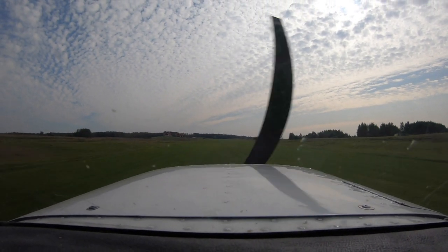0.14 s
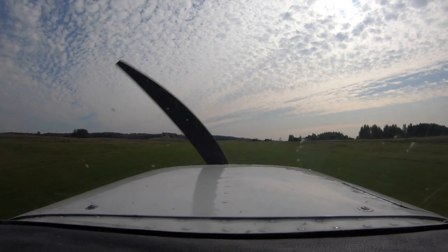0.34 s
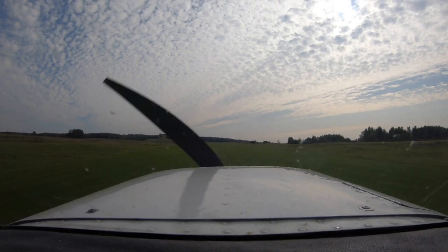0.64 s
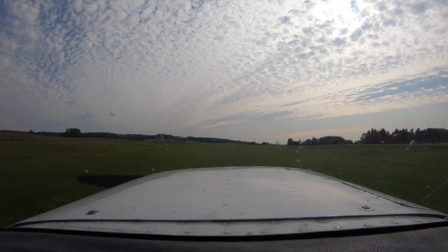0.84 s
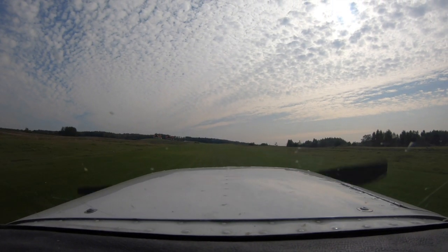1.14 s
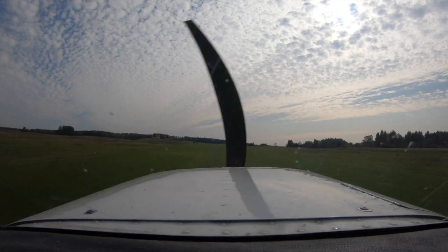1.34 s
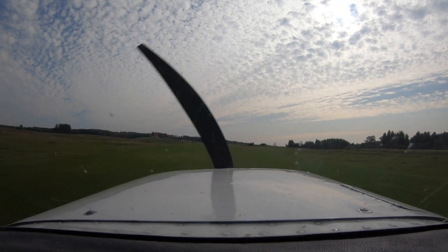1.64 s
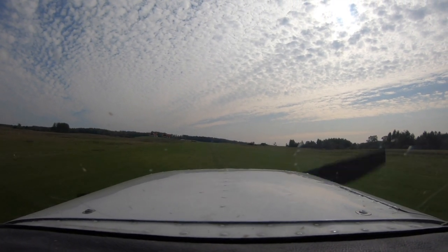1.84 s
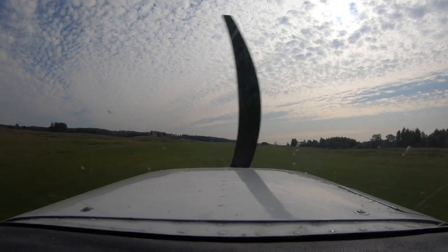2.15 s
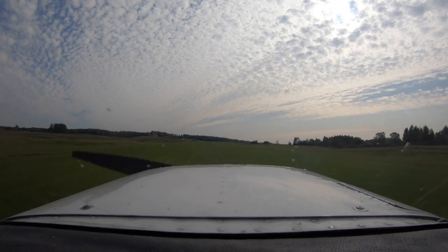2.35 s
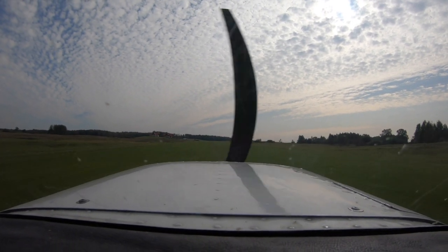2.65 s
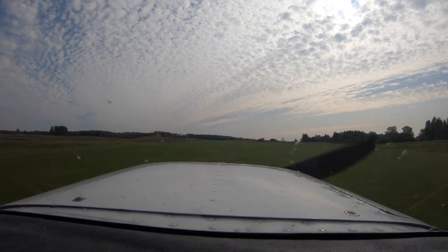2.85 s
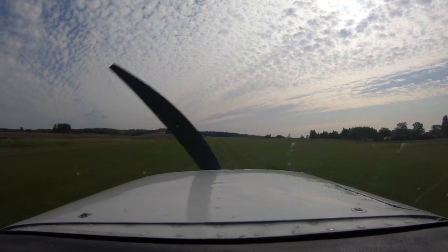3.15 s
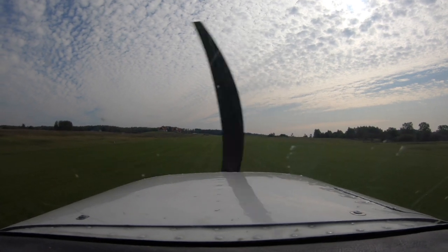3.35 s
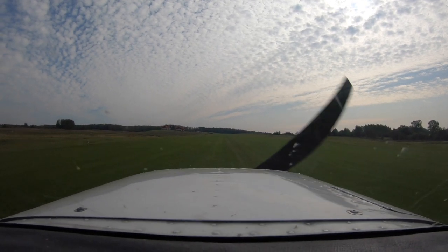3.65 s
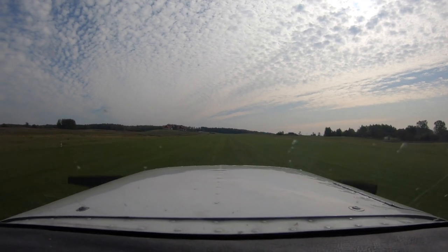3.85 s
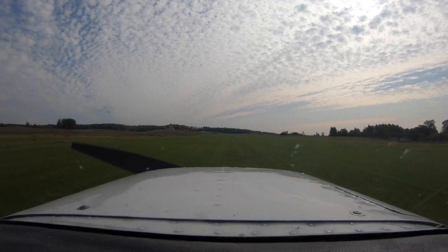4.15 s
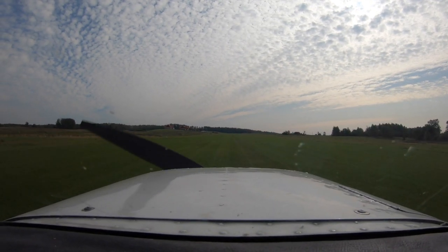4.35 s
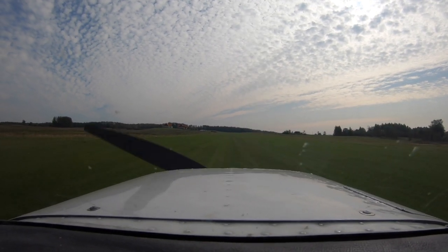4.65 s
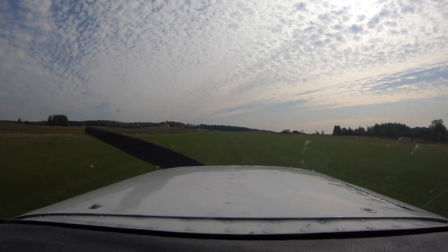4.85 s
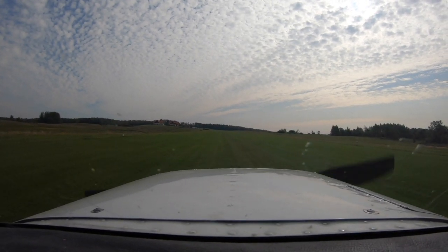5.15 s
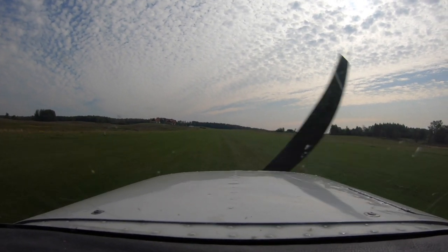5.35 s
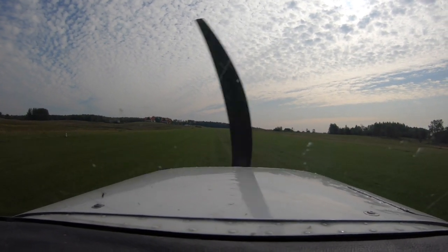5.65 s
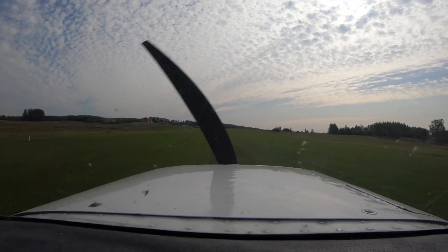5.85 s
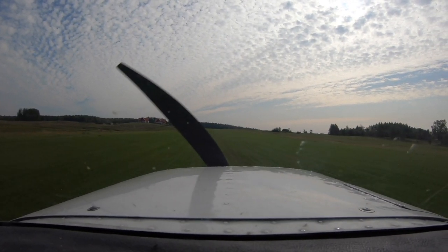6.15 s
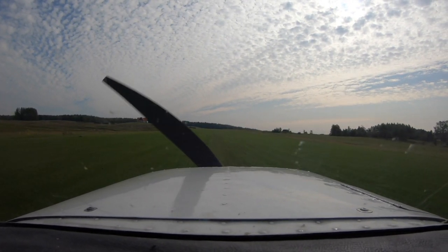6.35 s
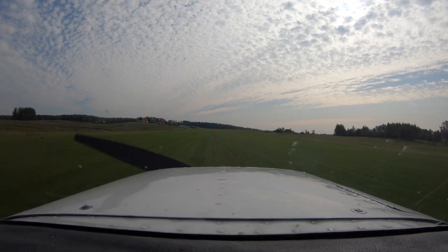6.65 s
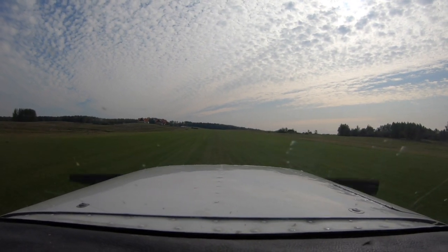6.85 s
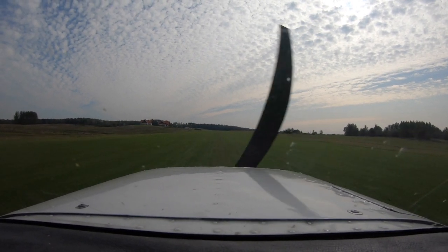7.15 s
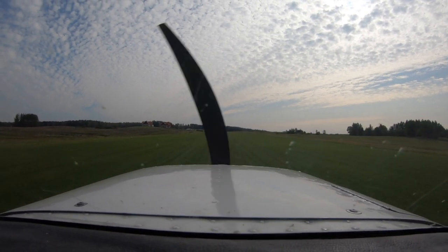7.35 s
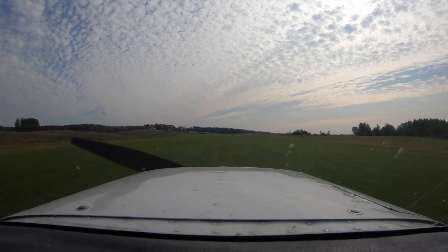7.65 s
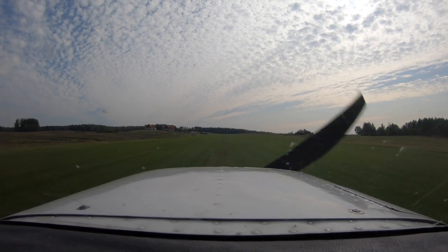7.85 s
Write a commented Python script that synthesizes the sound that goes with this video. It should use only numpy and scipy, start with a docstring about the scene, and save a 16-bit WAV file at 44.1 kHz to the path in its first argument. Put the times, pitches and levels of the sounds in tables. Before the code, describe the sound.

Heard from inside the cabin of a small propeller plane, a piston engine drones near idle and slowly sinks in pitch under the roar and hiss of passing air, with a faint wavering whistle. A little before halfway the wheels touch down on grass. A much louder rumble takes over, with irregular low thumps, drumming and knocking panels and bright rattles from loose fittings, continuing to the end.

```python
"""A light aircraft's four-cylinder engine near idle, heard in the cabin as it glides in and lands.
Firings and blades make a harmonic series that sinks as the engine slows. The slipstream roars and
hisses, panels hum, and air whistles in a gap. From about 3.5 s the wheels roll on grass: impacts
through the gear excite the airframe's modes, panels drum and knock, and loose fittings rattle."""
import sys
import numpy as np
from scipy import signal
from scipy.io import wavfile
from scipy.ndimage import uniform_filter1d

SR = 44100
rng = np.random.default_rng(int(sys.argv[2]) if len(sys.argv) > 2 else 0)


def persist_wave(psi):
    """Save psi, clipped to +-1, as 16-bit WAV."""
    counts = np.round(np.clip(psi, -1, 1) * 32767).astype(np.int16)
    wavfile.write(sys.argv[1], SR, np.atleast_2d(counts).T)


N = 352783
TIME = np.arange(N) / SR

# The slowing engine: time_s, firing_rate_hz
FIRING_RATE = [(0, 34.1), (1.3, 33.37), (2.6, 32.58), (3.7, 31.46), (4.8, 30.41), (6.2, 29.33), (7.1, 28.6),
               (8, 28.72)]
# Strength of the slipstream: time_s, roar_db, hiss_db
AIRFLOW_LEVELS = [(0, -33, -48), (1.2, -34, -49), (2.3, -36, -49.5), (3.4, -37, -50), (5.5, -34.5, -50.5),
                  (7.6, -35, -51), (7.82, -46, -55), (7.88, -30, -51), (8, -41, -49)]
# Resonances of the airframe: centre_hz, width_hz, boost_db
FRAME_MODES = [(110.6, 9.1, 6), (134, 10, 3.5), (180, 6.5, 2), (196.8, 5.5, 4), (215.2, 8.6, 3.5),
               (273, 24, 2), (348, 31, 2.5), (441, 38, 1.5), (831, 25, 8.5), (910, 25, 4.5), (1057, 37, 6),
               (1278, 35, 4.5)]
# Thumps through the landing gear: peak_time_s, peak_db, pitch_hz
GEAR_BUMPS = [(3.58, -18.5, 105.0), (3.69, -24, 200.2), (3.743, -21, 72), (3.825, -15, 43.2),
              (3.815, -16, 96), (3.825, -11, 135), (3.881, -14.5, 59.0), (4.011, -16.5, 54.2),
              (4.454, -16, 102.0), (4.623, -19.5, 107.2), (4.82, -24, 201.6), (4.869, -10.5, 103.6),
              (5.22, -14.5, 112.6), (5.264, -14, 68), (5.44, -16, 71.6), (5.565, -13.5, 57),
              (5.69, -21.5, 201), (5.743, -10, 59.7), (5.807, -17, 107.6), (5.909, -23, 66),
              (6.006, -15, 108), (6.072, -19, 87.5), (6.156, -11, 54.0), (6.218, -17, 54.3),
              (6.352, -16.5, 108.3), (6.451, -15.5, 59.3), (6.593, -12, 58.8), (6.649, -19, 75.3),
              (6.87, -15, 43.3), (6.922, -9, 59.3), (6.958, -16.5, 150.4), (6.97, -17, 70),
              (7.056, -13.5, 47.7), (7.058, -15, 207), (7.339, -15, 108.7), (7.451, -15, 53.5),
              (7.515, -16, 42.4), (7.577, -15, 58), (7.94, -10, 108.5), (7.974, -16, 48.3)]


def gain_of(db):
    """Amplitude ratio of a level in decibels."""
    return 10 ** (np.asarray(db) / 20)


def unit_rms(x):
    """Normalisation to a mean power of 1."""
    return x / np.sqrt(np.mean(x ** 2) + 1e-20)


def curve(rows, column, t=TIME):
    """Linear interpolation of one table column in time."""
    rows = np.asarray(rows)
    return np.interp(t, rows[:, 0], rows[:, column])


def add(mix, start_s, sound):
    """Superposition of a sound on the mix."""
    part = mix[round(start_s * SR):][:len(sound)]
    part += sound[:len(part)]


def wander(rate_hz, span=20):
    """Random modulation of rms 1: sines from rate_hz / span to rate_hz, the slower ones stronger."""
    return unit_rms(sum(np.sin(2 * np.pi * (hz * TIME + rng.random())) / np.sqrt(hz)
                        for hz in np.geomspace(rate_hz / span, rate_hz, num=16)))


def resonate(x, hz, q):
    """Response of a second-order resonator driven by x."""
    return signal.lfilter(*signal.iirpeak(hz, q, SR), x)


def coloured(x, spectrum, modes=()):
    """Minimum-phase filtering: imposes a spectrum and resonances while clicks stay sharp; rms 1."""
    hz = abs(np.fft.fftfreq(16384, 1 / SR))
    points_hz, points_db = np.transpose(spectrum)
    shape_db = np.interp(np.log(hz + 1), np.log(points_hz + 1), points_db, left=-60, right=-90)
    for centre_hz, width_hz, boost_db in modes:
        shape_db += boost_db / (1 + (2 * (hz - centre_hz) / width_hz) ** 2)
    log_gain = np.log(gain_of(np.maximum(shape_db, -100)))
    response = np.exp(np.conj(signal.hilbert(log_gain)))
    taps = np.fft.ifft(response).real[:8192]
    return unit_rms(signal.oaconvolve(x, taps)[:N])


def shot_noise(per_s, spread_db, noise_share):
    """A Poisson train of unequal impulses over a bed of white noise."""
    sizes = gain_of(spread_db * np.minimum(rng.exponential(1, N), 3.5)) * rng.choice([-1., 1.], N)
    impulses = unit_rms(sizes * (rng.random(N) < per_s / SR))
    return (1 - noise_share) * impulses + noise_share * rng.standard_normal(N)


def swell_power(rows, rise_s, fall_s):
    """Incoherent addition: the summed power of exponential swells, one peaking at each row's time."""
    peak_time_s, peak_db = np.transpose(rows)[:2, :, None]
    t = TIME[::32] - peak_time_s
    power = gain_of(2 * peak_db) * np.exp(np.where(t < 0, t / rise_s, -t / fall_s))
    return np.interp(TIME, TIME[::32], power.sum(axis=0))


def ring(hz, peak_db, rise_s, t60_s, length_s=.3):
    """A damped mode builds up and decays; returns the time to its peak and the sound."""
    t = np.arange(0, length_s, 1 / SR)
    envelope = (1 - np.exp(-t / rise_s)) ** 2 * gain_of(-60 * t / t60_s)
    vibration = np.sin(2 * np.pi * (hz * t + rng.random()))
    return envelope.argmax() / SR, gain_of(peak_db) * envelope / envelope.max() * vibration


def tone(rows, jitter):
    """A sine with random frequency modulation, following rows of time_s, pitch_hz, level_db."""
    t = np.arange(rows[0][0], rows[-1][0], 1 / SR)
    drift = unit_rms(uniform_filter1d(rng.standard_normal(len(t)), size=900))
    phase = 2 * np.pi * np.cumsum(curve(rows, 1, t) * (1 + jitter * drift)) / SR
    envelope = np.sqrt(2) * gain_of(curve(rows, 2, t)) * signal.windows.tukey(len(t), .15)
    out = np.zeros(N)
    add(out, t[0], envelope * np.sin(phase))
    return out


def firing_count():
    """Phase is the integral of frequency: the count of firings, and so of passing blades."""
    return np.cumsum(curve(FIRING_RATE, 1) * (1 + 0.0029 * wander(3.045))) / SR


def engine(firings):
    """Periodic forcing by engine and propeller gives harmonics; uneven firing makes each waver."""
    # Engine orders: multiple_of_firing_rate, level_db
    orders = [(.5, -45.5), (1, -34), (1.5, -45), (2, -35), (2.5, -45), (3, -35.5), (3.5, -47), (4, -41.5),
              (4.5, -52), (5, -49.5), (6, -49.5)]
    cabin_hz, width_hz, boost_db = 59.8, 6.6, 8  # the second order slides into this air resonance
    boom_db = boost_db / (1 + (2 * (2 * curve(FIRING_RATE, 1) - cabin_hz) / width_hz) ** 2)
    out = np.zeros(N)
    for order, level_db in orders:
        level = gain_of(level_db + boom_db * (order == 2) + 2.8 * wander(14, span=10))
        cycles = order * firings + rng.random() + .06 * wander(10, span=8)
        out += np.sqrt(2) * level * np.sin(2 * np.pi * cycles)
    return out


def slipstream(firings):
    """Turbulent air on the cabin makes broadband noise; each passing blade modulates the hiss."""
    # Spectrum of the low roar: frequency_hz, relative_density_db
    roar_spectrum = [(5, -28), (12, -9), (44, -3.5), (92, -5.5), (195, -9), (243, -16), (292, -17),
                     (330, -22.5), (395, -25.5), (770, -36.5), (852, -33.5), (1060, -42), (1500, -48.5),
                     (1950, -82), (3300, -120)]
    # Spectrum of the hiss: frequency_hz, relative_density_db
    hiss_spectrum = [(350, -17), (600, -7.5), (756, -6.5), (940, -1.5), (1050, -5), (1340, -9), (1390, -7),
                     (2070, -7.5), (2240, -6), (3150, -7), (4490, -4.5), (8610, -12.5), (11500, -12.5),
                     (14000, -23), (15400, -44)]
    roar = coloured(rng.standard_normal(N), roar_spectrum)
    roar_db = curve(AIRFLOW_LEVELS, 1) + wander(4.7)
    hiss_db = curve(AIRFLOW_LEVELS, 2) + np.cos(2 * np.pi * firings) + 0.44 * wander(7.2)
    hiss = coloured(shot_noise(2500, spread_db=2.0, noise_share=0.7), hiss_spectrum)
    return roar * gain_of(roar_db) + hiss * gain_of(hiss_db)


def panel_hum():
    """Panel resonances driven by noise, their level following the slipstream's hiss."""
    # Humming panels: centre_hz, width_hz, level_db (with the hiss at reference_db)
    panels = [(850, 27, -64.5), (3930, 770, -58.5), (9530, 49, -70)]
    reference_db = -49
    drive_db = curve(AIRFLOW_LEVELS, 2) - reference_db
    return sum(gain_of(db + drive_db) * unit_rms(resonate(rng.standard_normal(N), hz, hz / width_hz))
               for hz, width_hz, db in panels)


def whine():
    """A thin, nearly pure tone that sags slowly in pitch and level."""
    pitch_hz, level_db, length_s = 2210, -65.5, 3.4
    sag_hz_per_s, fade_db_per_s = 8.8, 1.5
    end = (length_s, pitch_hz - sag_hz_per_s * length_s, level_db - fade_db_per_s * length_s)
    return tone([(0, pitch_hz, level_db), end], jitter=0.00264)


def panel_drone():
    """One panel vibrates in a single mode, swelling now and then."""
    # Course of the drone: time_s, pitch_hz, level_db
    drone = [(0, 285, -47), (.36, 285, -57), (.47, 286, -41.5), (.7, 285, -59.5), (.82, 285.4, -47.5),
             (1.1, 284, -49.5), (1.33, 283.5, -57), (1.48, 284.7, -39.5), (1.58, 284, -53),
             (1.7, 283.6, -49), (1.84, 284.4, -43), (1.93, 283.7, -59), (2.02, 286.5, -44.5),
             (2.25, 284.7, -55), (2.7, 284.7, -48.5), (2.8, 284.2, -55), (2.89, 286.3, -45.5),
             (3.08, 284, -58.5), (3.25, 284.3, -47.5), (3.5, 285.6, -52), (3.62, 284.8, -31.5),
             (3.72, 286, -43), (3.9, 287, -41), (4.3, 282, -51)]
    return tone(drone, jitter=.02)


def gap_whistle():
    """Flow-driven oscillation in a gap flips between two notes, each bent toward the other at its ends."""
    # Whistled notes: start_s, length_s, pitch_hz, level_db
    notes = [(.27, 0.44, 1175, -64.5), (0.752, 0.22, 1320, -65), (.97, 0.12, 1205, -64),
             (1.382, 0.31, 1336, -64), (1.789, 0.17, 1210, -65), (2.06, 0.47, 1320, -65),
             (2.623, 0.49, 1200, -67), (3.043, .1, 1330, -66)]
    between_hz, bend_hz = 1260, 29.8
    out = np.zeros(N)
    for start_s, length_s, hz, db in notes:
        bent_hz = hz + bend_hz * np.sign(between_hz - hz)
        arch = [(start_s, bent_hz, db), (start_s + length_s / 2, hz, db), (start_s + length_s, bent_hz, db)]
        out += tone(arch, jitter=0.005)
    return out


def chatter(per_s, spread_db, noise_share):
    """Loose parts as independent resonators, each struck in bunches of its own."""
    # Resonances of the parts: centre_hz, quality_factor
    parts = [(1200, 2.3), (2300, 1.2), (3700, 2.2), (5400, 2.2), (7600, 2.3), (11000, 1.4)]
    out = np.zeros(N)
    for hz, q in parts:
        band = unit_rms(resonate(shot_noise(per_s, spread_db, noise_share), hz, q))
        bunching = gain_of(2.2 * wander(40, span=10))
        out += band * np.sqrt(hz / q) * bunching  # power in proportion to bandwidth
    return out


def ground_roll():
    """Random forcing by turf under the wheels: the frame rumbles, panels drum, loose parts rattle."""
    # Strength of the roll: time_s, rumble_db, drumming_db, rattle_db
    levels = [(3.46, -34, -75, -68), (3.58, -20.5, -42.5, -47.5), (3.76, -21.5, -45, -48),
              (3.825, -16.5, -42.5, -45.5), (3.92, -23, -42, -49), (3.99, -19, -45, -47.5),
              (4.08, -21.5, -47, -52), (4.22, -23.5, -43.5, -55), (4.36, -19.5, -42.5, -48.5),
              (4.9, -20.5, -41, -48.5), (5.3, -23, -42.5, -50), (5.55, -22, -45, -53),
              (5.72, -21.5, -39, -48), (6.1, -21, -45.5, -50), (6.52, -20.5, -44, -49.5),
              (6.92, -19.5, -39, -49), (7.15, -18.5, -39, -47.5), (7.27, -18.5, -46.5, -51.5),
              (7.4, -22, -43, -50), (7.66, -20.5, -44.5, -53.5), (7.8, -25.5, -46.5, -53),
              (7.86, -23, -47, -56), (7.92, -27.5, -41, -52)]
    # Spectrum of the frame's rumble: frequency_hz, relative_density_db
    rumble_spectrum = [(7.1, -30), (12, -6.5), (48, 0), (107, -2), (162, -4.5), (208, -4), (352, -18.5),
                       (392, -28), (470, -26.5), (514, -31.5), (751, -36), (808, -35.5), (900, -34.5),
                       (1170, -57.5), (1980, -120)]
    # Spectrum of the drumming panels: frequency_hz, relative_density_db
    drumming_spectrum = [(210, -40), (350, 0), (393, -6.5), (467, -5.5), (520, -16.5), (751, -9.5),
                         (822, -14.5), (984, -13.5), (2040, -24.5), (3000, -23.5), (3900, -38),
                         (6600, -120)]
    # Spectrum of the rattling parts: frequency_hz, relative_density_db
    rattle_spectrum = [(880, -13), (1500, 3.5), (1590, -8), (2110, -10), (3750, 3.5), (5030, -4),
                       (7150, -3), (8690, -6), (11900, -8), (13600, -8), (15400, -33)]
    touchdown_s = levels[0][0]
    on_ground = np.clip((TIME - touchdown_s) / 0.12, 0, 1)
    jolts_db = wander(40, span=6)  # felt by all three layers at once
    rumble = coloured(shot_noise(300, spread_db=3.5, noise_share=0.61), rumble_spectrum, FRAME_MODES)
    drumming = coloured(shot_noise(400, spread_db=1.5, noise_share=0.6), drumming_spectrum, FRAME_MODES)
    rattle = coloured(chatter(500, spread_db=3.5, noise_share=0.45), rattle_spectrum)
    roll_power = gain_of(2 * (curve(levels, 1) - 0.5 + jolts_db))
    surge_db = -13  # the rumble's surge at each bump, relative to the bump's peak
    surge_power = gain_of(2 * surge_db) * swell_power(GEAR_BUMPS, rise_s=0.07, fall_s=0.059)
    rumble *= np.sqrt(roll_power + surge_power)
    drumming *= gain_of(curve(levels, 2) + 1.54 * jolts_db)
    rattle *= gain_of(curve(levels, 3) + 0.77 * jolts_db + wander(60, span=9))
    return on_ground * (rumble + drumming + rattle)


def gear_thumps():
    """Impact excitation: each bump through the gear rings one low, damped mode of the frame."""
    out = np.zeros(N)
    for peak_time_s, peak_db, hz in GEAR_BUMPS:
        lead_s, thump = ring(hz, peak_db, rise_s=0.0118, t60_s=0.196)
        add(out, peak_time_s - lead_s, thump)
    return out


def fitting_ticks():
    """Brief contacts have broad spectra: loose fittings tick in fast-decaying bursts of noise."""
    # Ticks: start_s, level_db, centre_hz
    ticks = [(3.593, -27, 11620), (3.607, -18, 5500), (3.6115, -20, 4060), (3.625, -17, 4350),
             (3.6666, -22, 3870), (3.7, -23, 8000), (3.7444, -25, 4270), (3.9095, -32, 3410),
             (4.2797, -39, 3640), (4.3261, -25, 3770), (4.4187, -33, 3620), (4.3504, -31, 10000),
             (4.4687, -30, 11500), (4.594, -34, 5000), (4.657, -34, 6000), (4.7845, -31, 3550),
             (4.8448, -26, 3570), (4.899, -27, 7000), (4.82, -32, 7000), (4.87, -27, 8000),
             (4.9876, -27, 6500), (5.0887, -30, 3920), (5.1489, -35, 4470), (5.228, -31, 11000),
             (5.448, -34, 1500), (5.672, -27, 7000), (5.872, -30, 8000), (5.906, -33, 3000),
             (5.939, -37, 5500), (5.9678, -27, 11800), (6.1423, -31, 4940), (6.181, -24, 3740),
             (6.252, -22, 3680), (6.276, -28, 7000), (6.3038, -20, 3800), (6.4757, -36, 5000),
             (6.627, -32, 7000), (6.682, -34, 6500), (6.89, -28, 4000), (6.9152, -26, 3210),
             (6.945, -38, 8000), (6.9671, -27, 3640), (7.0125, -29, 6500), (7.104, -28, 6000),
             (7.134, -34, 5000), (7.437, -30, 3370)]
    rise_s, t60_s = 0.00029, .024
    t = np.arange(2000) / SR
    envelope = (1 - np.exp(-t / rise_s)) * gain_of(-60 * t / t60_s)
    lowpass = signal.butter(4, 13500, fs=SR)
    out = np.zeros(N)
    for start_s, level_db, hz in ticks:
        noise = rng.standard_normal(len(t))
        body = unit_rms(resonate(noise, hz, q=1.8))
        sheen = 0.3 * resonate(noise, 8000, q=1.1)
        burst = signal.lfilter(*lowpass, body + sheen)
        add(out, start_s, gain_of(level_db) * envelope * burst / abs(burst).max())
    return out


def shaken_parts():
    """Dense collisions of shaken loose parts merge into short bursts of bright noise."""
    # Shakes: peak_time_s, level_db
    shakes = [(3.615, -34), (3.7, -37), (3.91, -45), (3.995, -44), (4.285, -46), (4.35, -42.5), (4.47, -44),
              (4.655, -42), (4.79, -44), (4.85, -44), (4.9, -41.5), (4.99, -44), (5.06, -51), (5.15, -47),
              (5.23, -44), (5.97, -49), (6.255, -43), (6.305, -48), (6.86, -48), (6.89, -46), (6.92, -47),
              (6.95, -48), (7.01, -44), (7.1, -48), (7.39, -50), (7.725, -47), (7.93, -49)]
    # Spectrum of the shaken parts: frequency_hz, relative_density_db
    spectrum = [(1500, -15), (2800, -4), (4000, 3.5), (7000, -1.5), (11500, -4), (13600, -6), (15400, -30)]
    collisions = coloured(chatter(700, spread_db=2.0, noise_share=0.61), spectrum)
    return collisions * np.sqrt(swell_power(shakes, rise_s=0.003, fall_s=0.014))


def panel_knocks():
    """A hard-struck panel rings in one damped mode over a clatter coloured by the frame's resonances."""
    # Knocks: peak_time_s, peak_db, pitch_hz
    knocks = [(3.618, -35.5, 818), (3.71, -41, 856), (3.837, -45, 834.0), (4.087, -39, 933),
              (4.37, -43, 815), (4.432, -44, 813.0), (4.502, -40.5, 840), (4.564, -41, 846),
              (4.817, -34, 818), (4.86, -44, 990), (4.885, -45, 840), (4.939, -41, 810), (5.035, -43, 840),
              (5.258, -40, 816), (5.34, -45, 776), (5.452, -39, 942), (5.641, -40, 921.0),
              (5.691, -41, 910.0), (5.761, -45, 888.0), (5.765, -41, 1060), (5.769, -44, 662.0),
              (5.839, -40, 910), (5.929, -36.5, 893), (6.018, -41, 864), (6.082, -42, 780),
              (6.134, -38, 917), (6.294, -38, 917), (6.334, -38, 846), (6.366, -42, 806), (6.47, -46, 880),
              (6.581, -43, 780), (6.623, -39.5, 687), (6.74, -39, 850), (6.836, -46, 888.0),
              (6.854, -41.3, 703), (6.882, -38, 1130), (6.89, -35, 910), (6.944, -41, 900),
              (7.17, -53, 840.0), (7.313, -41, 818.0), (7.571, -42, 825), (7.926, -45, 825)]
    # Spectrum of the clatter: frequency_hz, relative_density_db
    spectrum = [(400, -49), (650, -4), (820, 1.5), (1000, -0.5), (1350, -3.5), (1800, -19), (3000, -67)]
    clatter = gain_of(-2) * coloured(rng.standard_normal(N), spectrum, FRAME_MODES)
    out = clatter * np.sqrt(swell_power(knocks, rise_s=0.0085, fall_s=0.017))
    for peak_time_s, peak_db, hz in knocks:
        lead_s, knock = ring(hz, peak_db, rise_s=0.00501, t60_s=.06)
        add(out, peak_time_s - lead_s, knock)
    return out


def metal_pings():
    """Free vibration of a small metal part: three high modes that die away quickly."""
    # Pings: start_s, level_db
    pings = [(5.3292, -36), (6.5998, -32.5), (6.6637, -31.5), (6.7879, -46), (7.4369, -42)]
    # Modes of the part: pitch_hz, relative_db
    modes = [(5200, -1), (5480, -9), (7500, -13)]
    out = np.zeros(N)
    for start_s, level_db in pings:
        for hz, relative_db in modes:
            _, partial = ring(hz, level_db + relative_db, rise_s=.001, t60_s=.019, length_s=.04)
            add(out, start_s, partial)
    return out


def gusts():
    """Amplitude-modulated band noise: brief swells in the hiss of the air."""
    # Swells: peak_time_s, level_db
    swells = [(5.92, -60), (6.93, -49), (7.38, -52), (7.6, -53), (7.71, -48.5), (7.9, -52), (7.99, -44.5)]
    centre_hz, q = 3900, 2.3
    band = resonate(rng.standard_normal(N), centre_hz, q)
    hiss = unit_rms(resonate(band, centre_hz, q))
    return hiss * np.sqrt(swell_power(swells, rise_s=0.019, fall_s=0.016))


def scene():
    """Superposition of all sources at one point in the cabin."""
    firings = firing_count()
    flight = engine(firings) + slipstream(firings) + panel_hum() + whine() + panel_drone() + gap_whistle()
    landing = ground_roll() + gear_thumps() + fitting_ticks() + shaken_parts() + panel_knocks()
    return (flight + landing + metal_pings() + gusts())[None]


def record(dry):
    """Band limiting: a linear-phase low-pass filter removes the highest treble."""
    cutoff_hz = 15650
    taps = signal.firwin(511, cutoff_hz, window=("kaiser", 9), fs=SR)
    return signal.oaconvolve(dry, taps[None], "same")


dry = scene()
out = record(dry)
persist_wave(out)
```